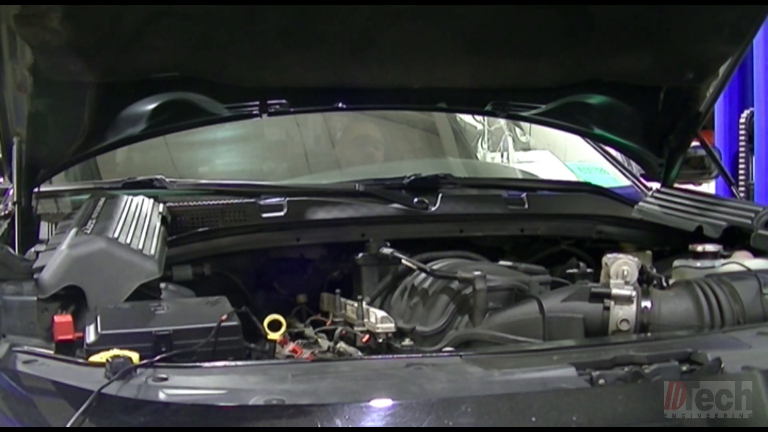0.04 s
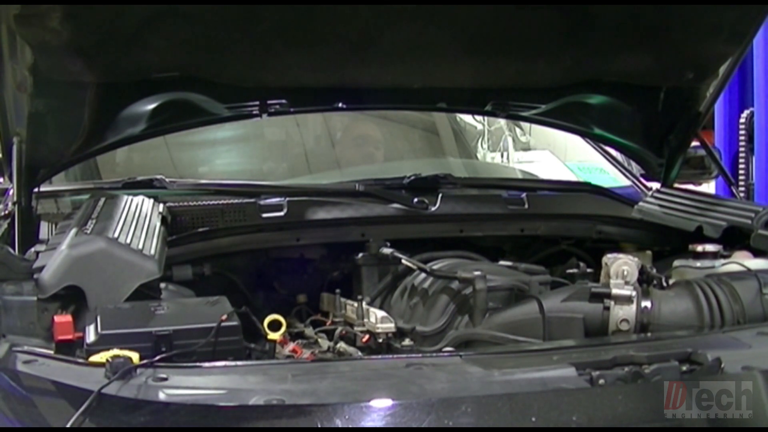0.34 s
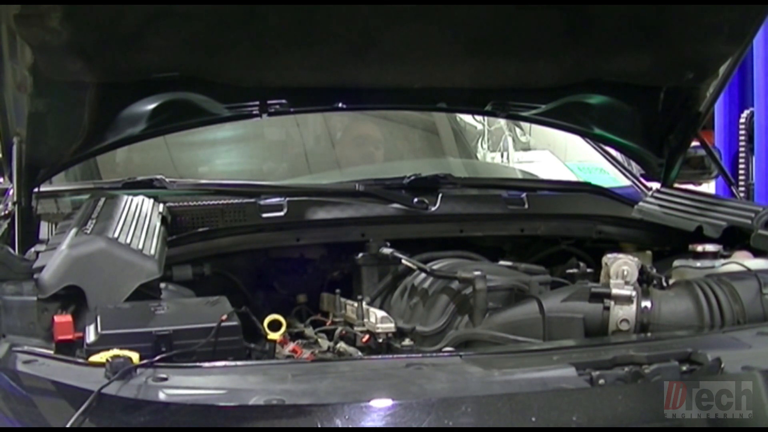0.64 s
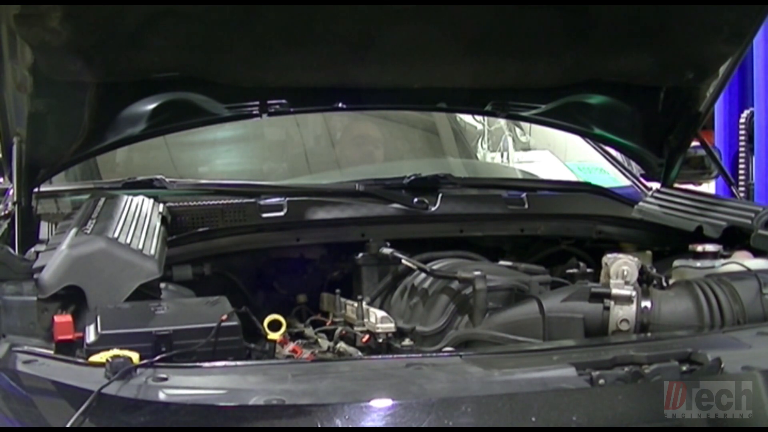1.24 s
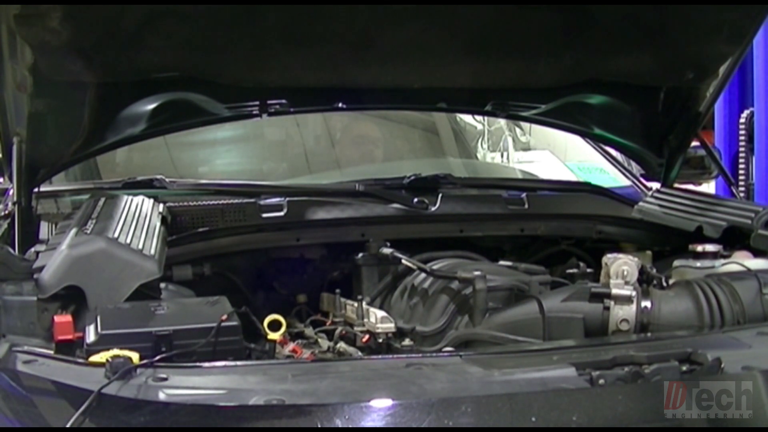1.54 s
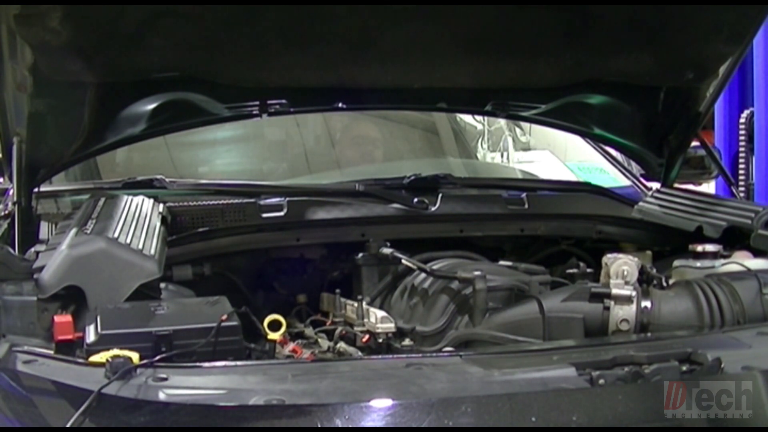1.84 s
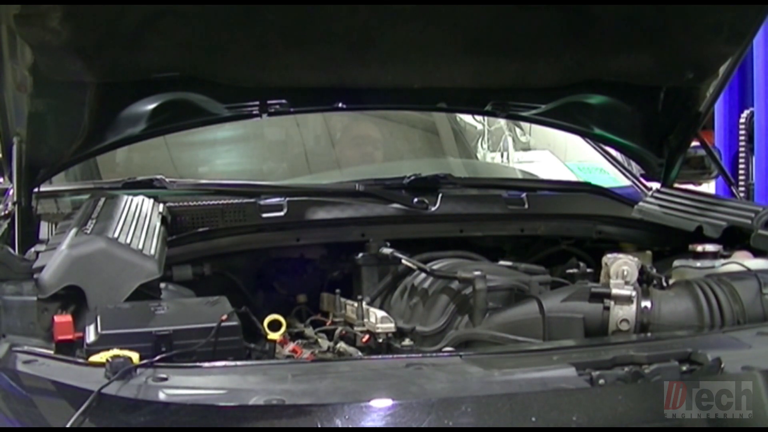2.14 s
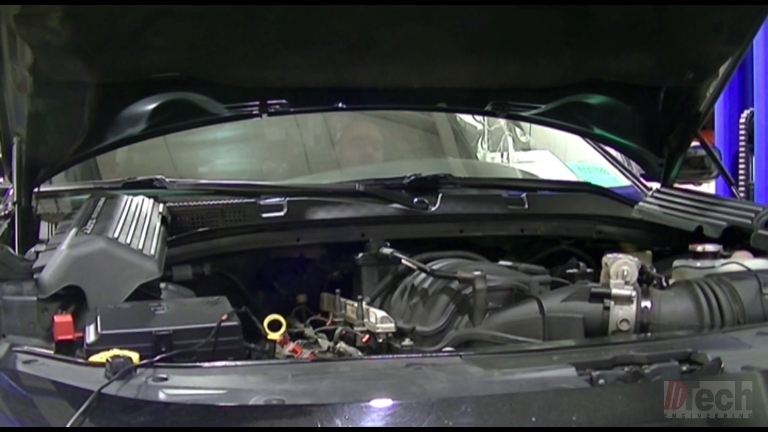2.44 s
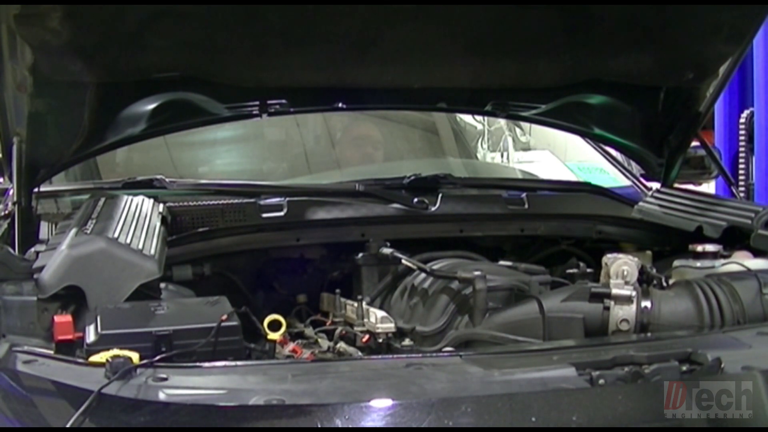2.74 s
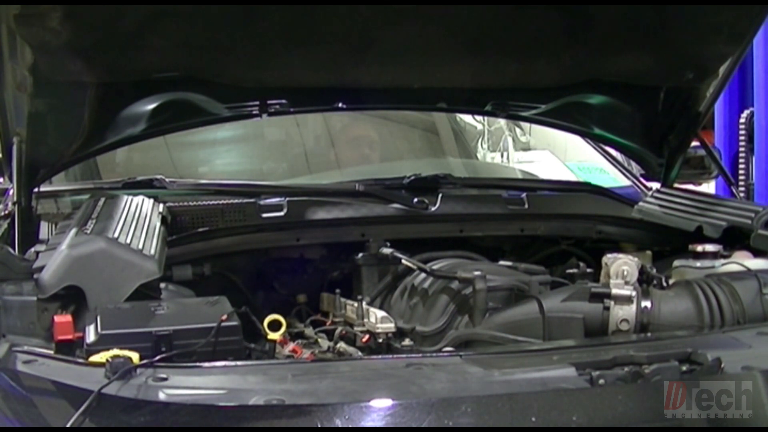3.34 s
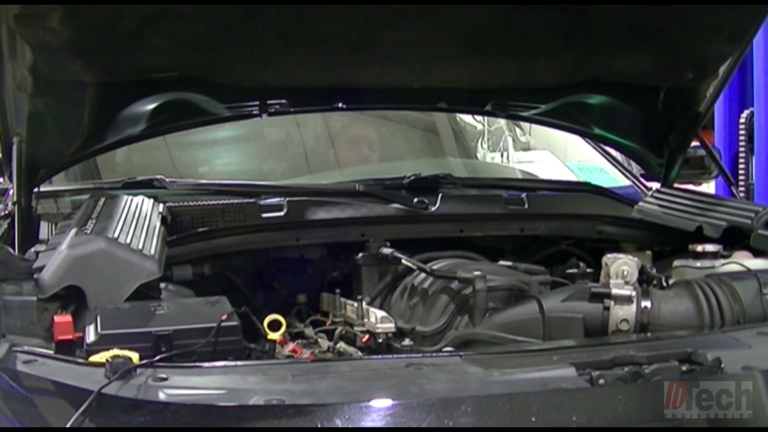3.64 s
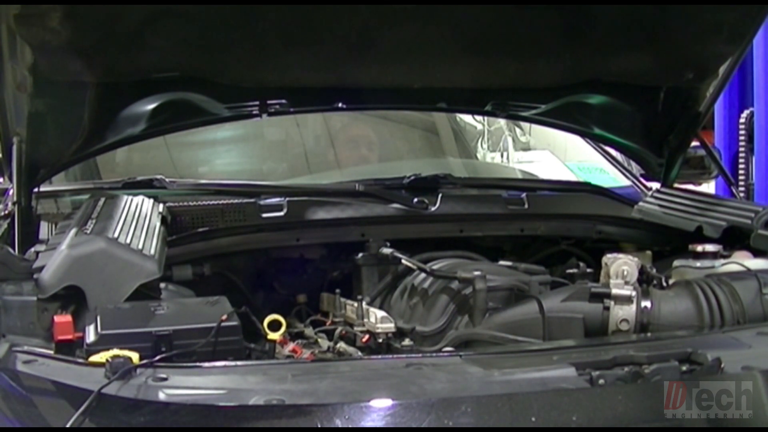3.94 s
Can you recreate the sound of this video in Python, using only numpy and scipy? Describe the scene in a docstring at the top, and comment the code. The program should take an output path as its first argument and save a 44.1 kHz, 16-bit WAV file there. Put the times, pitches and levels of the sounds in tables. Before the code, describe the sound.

A car engine idles with a sharp metallic knock, heard over the open engine bay. Two hard knocks land in the first 0.2 seconds, followed by weaker, uneven ones as the idle drops slightly. From about 1.2 seconds to the end at 4 seconds, the knocking is hard and regular, about twelve a second, ringing briefly in the workshop. Underneath run a hum, belt and fan rush, and faint ticks.

```python
"""Knocking eight-cylinder engine, settling to a fast idle in a workshop, heard over the open bay.
A loose part strikes once per firing cycle: fitfully at first, then hard on every cycle.
Each knock rings the metal, then the hollow of the bay and the room.
Underneath: firing hum, rush of belts, fan and valve gear, thin injector ticks."""
import sys
import numpy as np
from scipy import signal
from scipy.fft import rfft, irfft
from scipy.io import wavfile
from scipy.ndimage import uniform_filter1d

SR = 44100
rng = np.random.default_rng(int(sys.argv[2]) if len(sys.argv) > 2 else 0)


def generate_wav(signal):
    """Clip the signal to [-1, 1] and save it as 16-bit WAV at the path in sys.argv[1]."""
    frames = np.transpose(np.atleast_2d(signal))
    scaled = np.clip(frames, -1, 1) * 32767
    pcm = np.round(scaled).astype(np.int16)
    wavfile.write(sys.argv[1], SR, pcm)


N = 176400
TIME_S = np.arange(N) / SR
CYLINDERS = 8
METAL_RISE_S, METAL_T60_S = 0.00092, 0.073

# Workshop reverberation: f/Hz, t60/s, level/dB
ROOM_DECAY = [(200, .6, -22), (710, 0.45, -1), (1960, 0.49, -7.5), (6000, 0.44, -6.5), (9900, 0.19, -9.5),
              (15000, .22, -31)]
# Stereo side signal: f/Hz, gain/dB
SIDE_GAIN = [(30, -19), (80, -34), (200, -40), (400, -36), (700, -27), (1400, -20), (3000, -18),
             (8000, -19), (14000, -30)]
# Engine speed: t/s, firing rate/Hz
FIRING_RATE = [(0, 106), (.2, 101), (.4, 97), (.6, 95.6), (.85, 94.5), (1.45, 94.2), (1.8, 92.6),
               (2.25, 90.9), (2.8, 92.1), (3.2, 91.7), (3.6, 90.6)]
# Belts, fan and valve gear: f/Hz, relative density/dB
RUSH_SPECTRUM = [(20, -28), (60, -37.5), (110, -20.5), (170, -10.5), (230, -6.5), (310, -7.5), (420, -3),
                 (520, -1), (660, 5), (830, -1), (990, 1.5), (1250, -3.5), (1700, -6), (2300, -4.5),
                 (3200, -10.5), (4200, -13.5), (6300, -16.5), (8500, -19), (11000, -21.5), (13000, -29),
                 (16000, -35)]
# Rush envelope: t/s, level/dB, extra treble/dB, extra bass/dB
RUSH_LEVEL = [(0, -28.5, -1.5, 7.5), (.22, -30.5, -0.5, 3), (.32, -34, 1.5, 10), (.6, -32.5, -1, 7),
              (.85, -34.5, -0.5, -2), (1.15, -34.5, -1, 0), (1.3, -33.5, 1, -6), (2, -34.5, 1, 1.5),
              (3, -36, 1.5, 0), (4, -35.5, 3.5, -2)]
# Main hum lines: multiples of the cycle rate
HUM_ORDERS = [8, 16, 24, 32, 35, 36]
# Main hum envelopes: t/s, then level/dB for each of HUM_ORDERS
HUM_LEVELS = [(0, -57, -57, -46, -56, -55, -48), (.42, -53, -44, -43.5, -62, -47, -59),
              (.52, -63.5, -41, -36.5, -42.5, -45, -62), (.7, -62, -42.5, -34.5, -42, -53, -62),
              (.85, -57, -42, -39, -40, -54, -65), (1.62, -58.5, -45, -40.5, -43, -49, -64),
              (1.9, -57, -49, -43.5, -55, -56, -44.5), (2.35, -56, -52, -41, -54, -58, -51),
              (2.9, -56.5, -51, -47.5, -53.5, -48.5, -47.5), (3.5, -57, -53, -46, -50, -57, -49),
              (3.68, -57, -54.5, -47, -54, -63, -62), (3.77, -58.5, -53, -61, -55, -63, -55)]
# Lines from unequal cylinders: multiple of the cycle rate, level/dB
UNEVEN_LINES = [(11, -73), (12, -65.5), (15, -67.5), (18, -59.5), (19, -71), (22, -60.5), (23, -59.5),
                (25, -50.5), (26, -53), (30, -53.5), (33, -59.5), (39, -52)]
# Their common envelope: t/s, gain/dB
UNEVEN_GAIN = [(3.66, -0.5), (3.8, -4)]
# Air resonances of the bay: f/Hz, level/dB, peak time/s, swell narrowness
BAY_MODES = [(650.2, -25, 0.018, 11.7), (734.3, -34, 0.014, 5), (962, -28.5, 0.0077, 5.8),
             (1142, -40, 0.019, 1.4)]
# After-ring off the bonnet: f/Hz, level/dB, peak time/s, swell narrowness
BONNET_MODES = [(1032, -24, .020, 35), (980, -34, .028, 6)]
# First clack of the casting: f/Hz, level/dB, peak time/s, swell narrowness
CLACK_MODES = [(6200, -21, 0.0019, 7.3), (2305, -29.5, 0.0031, 5.7), (1956, -27.5, 0.0053, 5.8),
               (1374, -26.5, 0.0039, 18)]
# Strongest metal modes: f/Hz, level/dB, t60/s
METAL_MODES = [(1942, -27, 0.036), (2410, -45, 0.032), (4704, -33.5, 0.06), (6160, -31.5, 0.048),
               (6700, -36, 0.043), (6910, -32, 0.059)]
# Dense ring of the metal: f/Hz, level/dB
METAL_SPECTRUM = [(150, -18), (450, -1.5), (800, 2.5), (1400, 11.5), (1750, 10.5), (2000, 5.5),
                  (2400, 10.5), (2800, 7), (3300, 7), (3750, 2), (4200, 2), (4700, 6), (5150, -1.5),
                  (5650, 7.5), (6200, 5.5), (6800, 8), (7300, 4), (7700, 8.5), (8400, 1), (9500, 0.5),
                  (11000, 1.5), (11600, -8.5), (13000, -8.5), (16000, -23)]
# Contact snap: f/Hz, level/dB
SNAP_SPECTRUM = [(3000, -53), (5500, -22), (10000, -21), (12000, -34), (16000, -37)]
# Blows of the loose part: t/s, then gains body/dB, clack band/dB, top/dB, bonnet/dB
KNOCKS = [(0.0165, 3, -1, 0, -14), (0.0935, -29, -4, -10, -24), (0.1701, 2.5, 1.8, -2.5, -7),
          (0.3307, -3.5, 0.2, -3.5, -4), (0.4161, -11.5, -9, -13, -26), (0.4979, -13, -10, -13, -9),
          (0.5832, -19, -17, -12, -19), (0.6645, -5.5, -3, -6.5, -4), (0.7505, -12, -11.5, -13, -17),
          (0.9184, -8.5, -8, -9.4, -7), (1.0027, -11.5, -11.5, -13, -20), (1.1713, 0.5, 3.5, -1.5, -13),
          (1.2558, 1, 1.5, -1.5, -16), (1.3409, 2, 0, 0, -10), (1.4256, 0.5, 1.5, 0, -10),
          (1.5106, 1, 0.5, -0.5, -11), (1.5959, 1, 1, -1.5, -14), (1.6818, 1.5, 1, -0.5, -13),
          (1.7677, 0, 0.2, -1.5, -10), (1.8543, 0.2, 2.5, -2.5, -16), (1.941, 0.7, -0.5, 1, -9),
          (2.0282, -1, -1, 1, -2), (2.116, -1, -0.5, 1.5, -11), (2.2039, -1.5, 0, 1, -6),
          (2.2916, -1.5, -1, 0.8, -6), (2.3797, -1.5, -0.5, 1.5, -4), (2.4675, -0.6, -1.2, 0.5, -5),
          (2.5548, -1.5, -0.8, 0.5, -4), (2.6417, -2, -1.3, 1, -5), (2.729, -2.5, -1, 0.5, -2.5),
          (2.8156, -1.7, -1, 1, -4.5), (2.9026, -2, -1, 0.5, -2), (2.9897, -1, -1, 1, -3),
          (3.0773, -2.6, -1, 0.5, -3), (3.1645, -2, -0.5, 1.5, -2.5), (3.2516, -2, -1, 1.5, -1),
          (3.3389, -1.5, -1.2, 0.5, -1.5), (3.4264, -3, -1, 1, -3), (3.5142, -1.5, -1, 1, -4.5),
          (3.6023, -3, -0.5, 1.5, -3.5), (3.6908, -1.5, -0.3, 1.5, -5), (3.7793, -1, 0.8, 2.5, -3),
          (3.8675, -2, 1.2, 2, -3), (3.9555, -0.5, 1.5, 2.5, -1.5)]
# Anchors of the knock gains, f/Hz: body, clack band low edge, clack band high edge, top
KNOCK_BANDS_HZ = [2760, 4654, 6360, 8300]


def amp(db):
    """dB to gain."""
    return 10 ** (np.asarray(db) / 20)


def unit(x):
    """Scale to rms 1."""
    return x / np.sqrt(np.mean(x ** 2) + 1e-20)


def curve(table, t, column=1):
    """Table column, linear in time."""
    table = np.array(table)
    return np.interp(t, table[:, 0], table[:, column])


def spectrum(table, hz, column=1):
    """Table column, linear in log frequency."""
    table = np.array(table)
    return np.interp(np.log(hz + 1), np.log(table[:, 0]), table[:, column])


def colour(x, table):
    """Minimum-phase filter from a table of f/Hz, gain/dB."""
    hz = abs(np.fft.fftfreq(2048, 1 / SR))
    log_gain = np.log(amp(spectrum(table, hz)))
    taps = np.fft.ifft(np.exp(np.conj(signal.hilbert(log_gain)))).real
    return signal.fftconvolve(x, taps)[:len(x)]


def add(mix, start_s, sound):
    """Mix in at start_s."""
    part = mix[max(round(start_s * SR), 0):][:len(sound)]
    part += sound[:len(part)]


def wander(rate_hz):
    """Random drift, rms 1."""
    knots = rng.standard_normal(800)
    return unit(np.interp(TIME_S * rate_hz, np.arange(len(knots)), knots))


def decay(t, t60_s):
    """Exponential fall, 60 dB in t60_s."""
    return np.exp(-np.log(1000) * t / t60_s)


def swells(t, table):
    """Sum of resonances, each building to a peak and dying away."""
    out = np.zeros(len(t))
    for hz, db, peak_s, narrowness in table:
        envelope = (t / peak_s * np.exp(1 - t / peak_s)) ** narrowness
        out += amp(db) * envelope * np.sin(2 * np.pi * hz * t)
    return out


def dense_ring(t):
    """Countless modes or reflections: short burst, unit energy, flat spectrum."""
    envelope = (1 - np.exp(-t / METAL_RISE_S)) * decay(t, METAL_T60_S)
    bins = rfft(rng.standard_normal(len(t)) * envelope)
    local_power = uniform_filter1d(abs(bins) ** 2, size=48)
    return irfft(bins / np.sqrt(local_power), len(t))


def workshop_echo(x, delay_s=0.014, build_s=0.015):
    """Diffuse echo: brief build-up, fastest decay in the treble."""
    hz, t, noise = signal.stft(rng.standard_normal(SR // 2), SR, nperseg=256)
    envelope = decay(t, spectrum(ROOM_DECAY, hz)[:, None]) * np.minimum(t / build_s, 1)
    band_energy = np.mean(envelope ** 2, axis=1, keepdims=True) * SR / 2
    envelope *= amp(spectrum(ROOM_DECAY, hz, column=2))[:, None] / np.sqrt(band_energy)
    response = signal.istft(noise * envelope, SR, nperseg=256)[1]
    out = np.zeros(N)
    add(out, delay_s, signal.fftconvolve(x, response))
    return out


def injector_ticks(firings, level_db=-46, spread_db=3, t60_s=0.018, pitches_hz=(10500, 11300, 12300)):
    """One thin tick per firing; pitch and strength vary by cylinder."""
    t, out = np.arange(600) / SR, np.zeros(N)
    strength = amp(level_db + spread_db * rng.standard_normal(CYLINDERS))
    for count, start in enumerate(np.flatnonzero(np.diff(np.floor(firings)))):
        cylinder = count % CYLINDERS
        hz = pitches_hz[cylinder % len(pitches_hz)] * rng.uniform(1.0, 1.04)
        add(out, start / SR, strength[cylinder] * decay(t, t60_s) * np.sin(2 * np.pi * hz * t))
    return out


def machinery_rush(firings, gear_share=0.31, throb_depth=0.056, flutter_db=1):
    """Belt, fan and valve noise, throbbing with the firings; the valve gear repeats each cycle."""
    pattern, gear = rng.standard_normal(SR // 8), np.zeros(N)
    cycle_starts = np.flatnonzero(np.diff(np.floor(firings / CYLINDERS), prepend=-1))
    for start, end in zip(cycle_starts, [*cycle_starts[1:], N]):
        gear[start:end] = pattern[:end - start]
    white = np.sqrt(gear_share) * gear + np.sqrt(1 - gear_share) * rng.standard_normal(N)
    noise = unit(colour(white, RUSH_SPECTRUM))
    hz = np.fft.rfftfreq(N, 1 / SR)
    treble = irfft(rfft(noise) * np.interp(hz, [1890, 4770], [0, 1]), N)
    bass = irfft(rfft(noise) * np.interp(hz, [200, 510], [1, 0]), N)
    noise += treble * (amp(curve(RUSH_LEVEL, TIME_S, column=2)) - 1)
    noise += bass * (amp(curve(RUSH_LEVEL, TIME_S, column=3)) - 1)
    throb = 1 + throb_depth * np.cos(2 * np.pi * firings)
    return noise * throb * amp(curve(RUSH_LEVEL, TIME_S) + flutter_db * wander(rate_hz=60))


def firing_hum(firings, waver_db=2):
    """Firing harmonics, plus weaker wavering lines from unequal cylinders."""
    def line(order, rms_db):
        turns = order * firings / CYLINDERS + rng.random()
        return np.sqrt(2) * amp(rms_db) * np.sin(2 * np.pi * turns)

    main = sum(line(order, curve(HUM_LEVELS, TIME_S, column))
               for column, order in enumerate(HUM_ORDERS, 1))
    gain_db = curve(UNEVEN_GAIN, TIME_S)
    uneven = sum(line(order, db + gain_db + waver_db * wander(rate_hz=5.45))
                 for order, db in UNEVEN_LINES)
    return main + uneven


def struck_metal(t, snap_t60_s=0.0078):
    """One blow: bright contact snap, strong modes, dense ring."""
    rise = 1 - np.exp(-t / METAL_RISE_S)
    modes = sum(amp(db) * rise * decay(t, t60_s) * np.sin(2 * np.pi * (hz * t + rng.random()))
                for hz, db, t60_s in METAL_MODES)
    snap = colour(rng.standard_normal(len(t)) * decay(t, snap_t60_s), SNAP_SPECTRUM)
    return snap + modes + colour(dense_ring(t), METAL_SPECTRUM)


def knocks(variation=0.1, body_lag_s=0.001797, clack_db_per_db=0.39):
    """Same part, same spot: every blow rings nearly alike. Returns metal ring, hollow tock."""
    t = np.arange(6000) / SR
    hz = np.fft.rfftfreq(len(t), 1 / SR)
    common_ring = struck_metal(t)
    group_delay_s = np.interp(hz, KNOCK_BANDS_HZ[:2], [body_lag_s, 0])  # body trails the clack
    lag = np.exp(-2j * np.pi * np.cumsum(group_delay_s) * hz[1])
    clack_bins = rfft(swells(t, CLACK_MODES))
    bay, bonnet = swells(t, BAY_MODES), swells(t, BONNET_MODES)
    ring, tock = np.zeros((2, N))
    for start_s, body_db, clack_db, top_db, bonnet_db in KNOCKS:
        metal = common_ring + variation * colour(dense_ring(t), METAL_SPECTRUM)
        crack = amp(clack_db_per_db * body_db) * clack_bins  # hard blows crack more
        tone = amp(np.interp(hz, KNOCK_BANDS_HZ, [body_db, clack_db, clack_db, top_db]))
        add(ring, start_s, irfft((rfft(metal) * lag + crack) * tone, len(t)))
        add(tock, start_s, amp(body_db) * bay + amp(bonnet_db) * bonnet)
    return ring, tock


def scene(tock_send=0.2):
    """Engine dead ahead; scattered reflections add slight width."""
    firings = np.cumsum(curve(FIRING_RATE, TIME_S)) / SR  # running count
    ring, tock = knocks()
    mid = ring + tock + workshop_echo(ring + tock_send * tock)
    mid += firing_hum(firings) + machinery_rush(firings) + injector_ticks(firings)
    scatter = dense_ring(TIME_S[:SR // 20])
    side = colour(signal.fftconvolve(mid, scatter)[:N], SIDE_GAIN)
    return np.array([mid + side, mid - side])


def record(dry):
    """Steep low-pass at 15950 Hz."""
    taps = signal.firwin(401, 15950, window=("kaiser", 8), fs=SR)
    return signal.oaconvolve(dry, taps[None], "same")


dry = scene()
out = record(dry)
generate_wav(out)
```